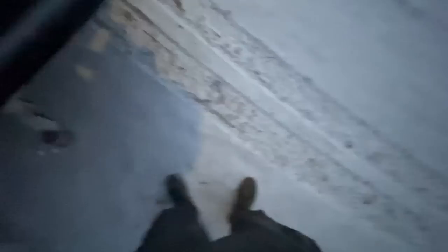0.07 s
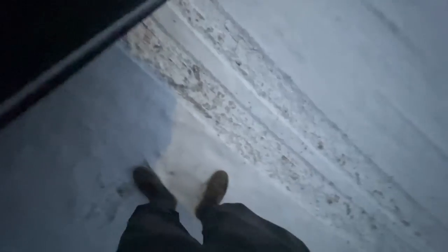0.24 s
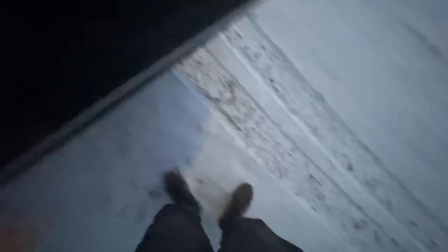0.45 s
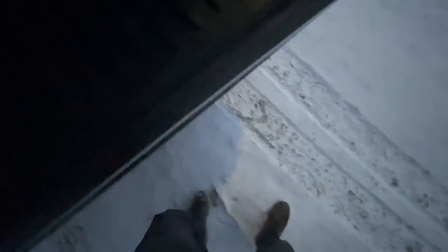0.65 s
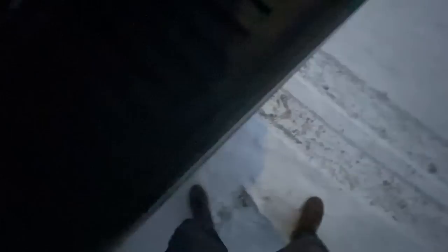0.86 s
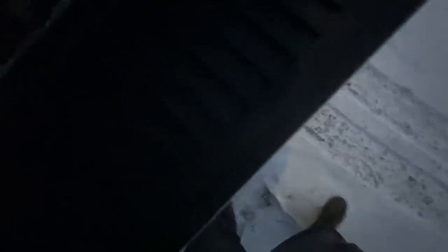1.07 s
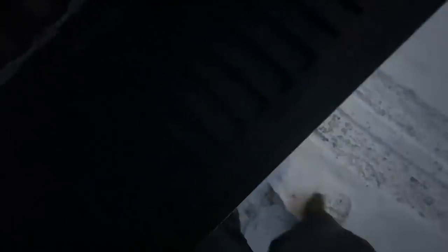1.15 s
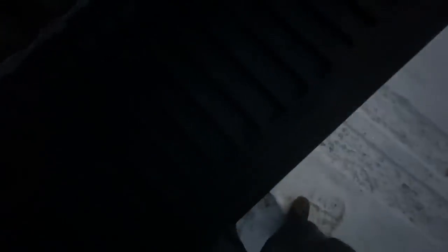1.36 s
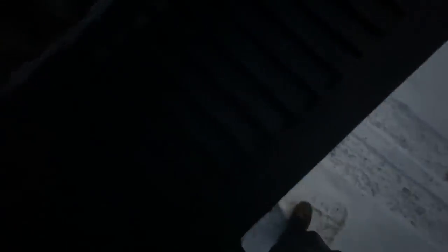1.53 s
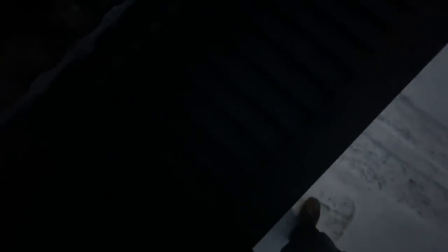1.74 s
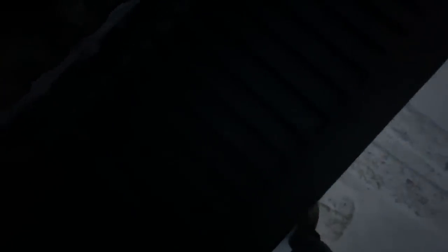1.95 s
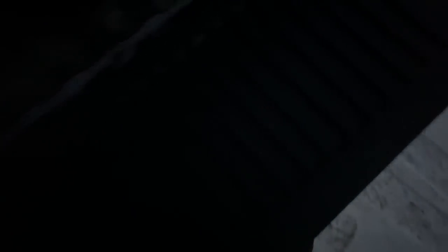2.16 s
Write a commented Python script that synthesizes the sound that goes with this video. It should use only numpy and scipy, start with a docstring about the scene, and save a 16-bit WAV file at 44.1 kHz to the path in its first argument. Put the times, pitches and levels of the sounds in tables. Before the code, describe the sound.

A truck tailgate unlatches with a heavy metallic thump, then rattles as boots creak on snow

```python
"""A tailgate is lowered by someone standing in snow. First a tug on the handle: light knocks and a faint bed rumble.
At 0.22 s the latch lets go in six blows and a sharp snap: noise bursts plus damped panel and steel modes that ring on.
The swinging gate knocks and squeaks (tones, noise bursts, trembling whistles) while a jacket swishes (bright noise).
From 0.8 s boots creak, scuff and snap the snow (short modes, grainy noise); from 1.8 s the gate knocks again.
Low outdoor noise lies under it all. Two spaced microphones hear the truck from the left, the boot from the right."""
import sys
import numpy as np
from scipy import signal
from scipy.fft import rfft, irfft, next_fast_len
from scipy.io import wavfile
from scipy.ndimage import uniform_filter1d

SR = 44100
rng = np.random.default_rng(int(sys.argv[2]) if len(sys.argv) > 2 else 0)


def materialize(psi):
    """Save the field psi as 16-bit PCM at rate SR to the path in sys.argv[1].

    A 1-D psi becomes a single channel; in a 2-D psi each row is a channel.
    """
    bounded = np.clip(np.atleast_2d(psi).T, -1, 1)
    quanta = np.round(bounded * 32767).astype(np.int16)
    wavfile.write(sys.argv[1], SR, quanta)


N = 97020
T = np.arange(N) / SR

# Spectra are relative: texture() scales each shaped noise to rms 1.
# latch blows: start_s, boom_db, clatter_db, crack_db
LATCH_BLOWS = [(0.222, -23.5, -17, -31.5), (.232, -9.5, -13.5, -26), (.243, -15, -13, -22),
               (0.247, -19.5, -14.5, -20), (0.262, -21.5, -16, -33), (0.28, -18.5, -20.5, -30.5)]
BLOW_RISE_S, BOOM_T60_S, CLATTER_T60_S, CRACK_T60_S = 0.0016, 0.18, 0.16, 0.13
# low boom of a blow: freq_hz, level_db
BOOM_SPECTRUM = [(30, -22.5), (50, -3.5), (100, -4.5), (160, -1), (230, -7.5), (400, -12.5), (900, -68.5)]
# mid clatter of a blow: freq_hz, level_db
CLATTER_SPECTRUM = [(80, -47), (250, -13), (350, -2), (680, -2.5), (950, -7), (1300, -8.5), (2000, -27),
                    (4000, -60.5)]
# bright crack of a blow: freq_hz, level_db
CRACK_SPECTRUM = [(500, -29.5), (1300, -9.5), (1850, 7), (2600, 1.5), (3200, -2.5), (3800, -8.5),
                  (5000, -12), (6500, -12), (8000, -16.5), (15000, -39)]
# modes of the steel panel: pitch_hz, level_db, t60_s
PANEL_MODES = [(59.7, -20, 1.18), (86, -24, 0.63), (105.5, -33.5, 4.5), (123.7, -11, 0.22),
               (168.8, -17.5, 0.33), (191.3, -29, 1), (228.8, -33, 1.3), (344, -29, 1), (385, -30.5, 0.63),
               (446.5, -31, 0.8), (504.6, -29.5, 0.6), (561, -24, .25), (910, -31.5, 0.17)]
PANEL_START_S, PANEL_RISE_S = 0.231, 0.006
# truck-bed rumble after the handle tug and the thump: start_s, level_db
BED_JOLTS = [(0, -33.5), (0.234, -17)]
BED_T60_S = 0.84
# truck-bed rumble: freq_hz, level_db
BED_SPECTRUM = [(30, -12.5), (55, -7.5), (150, 0.5), (250, -9.5), (500, -19), (1000, -23.5), (2500, -35.5),
                (15000, -60)]

# latch and hinge modes, level relative to the contact: pitch_hz, level_db, t60_s
STEEL_MODES = [(1065, 9, .2), (1790, -2, 0.083), (2040, -10.5, 0.35), (2540, -5, 0.093), (3686, 0.5, 0.07),
               (4540, -20.5, 0.018)]
# contact level relative to the blow's crack / the knock's crunch
STEEL_BLOW_DB, STEEL_KNOCK_DB, STEEL_RISE_S = -10, -14, 0.0024

# gate knocks: start_s, pitch_hz, tone_db, tone_t60_s, body_db, crunch_db, noise_t60_s
GATE_KNOCKS = [(.001, 317, -24, 0.25, -39, -47.5, 0.091), (.031, 298, -18, 0.068, -28.5, -28.5, 0.12),
               (0.038, 185.3, -27, 0.27, -35, -57, 0.3), (0.109, 123, -34, 0.064, -68, -42.5, 0.15),
               (.281, 161.5, -16, 0.1, -28.5, -43, 0.055), (.416, 358, -42, 0.034, -26, -29, 0.16),
               (.45, 141, -22, 0.059, -31.5, -60, .12), (.479, 233, -25, 0.16, -37, -50, 0.1),
               (.553, 1120, -23.5, 0.022, -32, -67, .06), (.599, 230, -25, 0.16, -37, -56, 0.091),
               (.727, 242, -21, 0.037, -38, -79.5, 0.098), (.851, 183, -28, 0.065, -36, -68, .05),
               (1.805, 136, -18.5, 0.1, -38, -32, 0.034), (1.813, 555, -26.5, 0.091, -34, -39.5, 0.18),
               (1.909, 750, -20, 0.045, -39, -37, 0.083), (1.957, 678, -13.5, 0.026, -27.5, -37, 0.1),
               (2.045, 158, -35, 0.29, -36.5, -48.5, 0.37), (2.076, 361.5, -20, 0.097, -26, -26, 0.062),
               (2.082, 165.4, -22.5, 0.19, -22.5, -43, 0.063), (2.109, 590, -29.5, 0.14, -31, -36.5, 0.11),
               (2.167, 591, -24, 0.076, -28.5, -43.5, 0.18)]
KNOCK_RISE_S = 0.0012
# hollow body of a knock: freq_hz, level_db
BODY_SPECTRUM = [(90, -26), (150, 5), (350, 7.5), (550, 2), (740, 6.5), (900, -14.5), (1250, -9.5),
                 (2200, -39.5)]
# gritty edge of a knock: freq_hz, level_db
CRUNCH_SPECTRUM = [(400, -17.5), (1200, 16.5), (1800, 6), (2600, 8.5), (3150, 4.5), (4300, -2.5),
                   (5600, -6), (12000, -44)]
# dry squeaks as the load shifts: start_s, pitch_hz, level_db, t60_s
SQUEAK_EVENTS = [(.031, 2099, -31.5, 0.043), (0.423, 2380, -20.5, 0.031), (1.806, 2663, -40.5, 0.19),
                 (1.912, 2570, -38, .06), (2.075, 4256, -34, 0.032)]
SQUEAK_RISE_S, SQUEAK_TREMBLE = 0.003, 0.025  # tremble: rms share of the pitch

# slips of snow packing under the boot: start_s, level_db
SNOW_CREAKS = [(.789, -36.5), (.806, -31), (.816, -37.5), (0.825, -35), (.836, -30)]
CREAK_RISE_S, GRIT_T60_S, GRIT_DB = 0.0007, 0.035, 3  # GRIT_DB relative to the creak
# sole modes, level relative to the creak: pitch_hz, level_db, t60_s
SOLE_MODES = [(511, 0, 0.052), (820, 1, 0.028)]
# grit of a creak: freq_hz, level_db
GRIT_SPECTRUM = [(200, -6), (500, 12), (900, 1), (1150, 1.5), (1600, -14.5), (3000, -21), (15000, -36.5)]
# sole scuffing loose snow: start_s, level_db, rise_s, t60_s
SNOW_SCUFFS = [(.83, -51, 0.013, 0.46), (1.055, -42, 0.016, 0.52), (1.15, -39, 0.018, 0.35)]
# snaps of the crust: start_s, level_db
CRUST_SNAPS = [(1.174, -36.5), (1.1958, -29), (1.209, -34), (1.2193, -35.5)]
SNAP_RISE_S, SNAP_T60_S = 0.0003, 0.016
# scuffs and snaps: freq_hz, level_db
SNOW_SPECTRUM = [(200, -16), (450, 5), (850, 3), (1300, -1.5), (2500, -7), (4500, -11.5), (7000, -27),
                 (15000, -25)]
# hiss of kicked-up powder: start_s, level_db, rise_s, t60_s
POWDER_HISSES = [(1.04, -44, 0.043, .4), (1.285, -44, 0.014, 0.12)]
# powder hiss: freq_hz, level_db
POWDER_SPECTRUM = [(4000, -38), (6500, -3), (9000, -12), (10500, -12), (13000, 0), (15500, -10.5)]

# bright noise bursts, the latch's sharp snap at .227, otherwise jacket swishes: start_s, level_db, rise_s, t60_s
BRIGHT_BURSTS = [(.108, -50, 0.00087, 0.042), (.227, -25, 0.00079, 0.082), (.415, -42.5, 0.0033, 0.098),
                 (.554, -43, 0.0012, 0.12), (.607, -43.5, .0003, 0.086), (.722, -44, 0.0058, 0.073),
                 (.78, -42.5, 0.026, 0.19)]
# faint rustle of clothes between the bursts: time_s, level_db
RUSTLE_LEVEL = [(0, -61.5), (.2, -58.5), (.3, -49.5), (.5, -55), (.68, -65.5), (.95, -67), (1.2, -58),
                (1.32, -62.5), (1.38, -96), (1.78, -73.5), (1.81, -59.5), (2.2, -63.5)]
# bright noise: freq_hz, level_db
BRIGHT_SPECTRUM = [(800, -25), (3000, 3), (5000, -0.5), (6400, 3.5), (7500, -6), (8800, 5), (10500, -8),
                   (13500, -1), (16000, -31.5)]
# outdoor rumble: freq_hz, level_db
AIR_SPECTRUM = [(30, -24), (52, -2.5), (90, -5), (140, -13), (300, -18.5), (700, -24), (1380, -23.5),
                (1650, -27), (3600, -52), (15000, -56)]
# outdoor rumble over time: time_s, level_db
AIR_LEVEL_CURVE = [(0, -38.5), (.7, -46.5), (.95, -43), (1.45, -49.5), (1.75, -49.5), (2.2, -41)]

# arrival from the truck: freq_hz, left_lead_ms
TRUCK_LEAD = [(550, 0.62), (1200, 0.4676)]
# arrival from the boot: freq_hz, left_lead_ms
BOOT_LEAD = [(1000, -0.069)]
# left lead of the bright noise, narrowing to the centre in the top treble: freq_hz, left_lead_ms
BRIGHT_LEAD = [(6000, 0.41), (10500, 0.011)]
# share common to both channels in most textures: freq_hz, power_share
COMMON_SHARE = [(100, 0.98), (1200, 0.6), (2500, 0.35), (8000, 1)]
# share common to both channels in the bright noises, complete above 12 kHz: freq_hz, power_share
BRIGHT_COMMON_SHARE = [(3000, 0.74), (9000, 0.13), (12000, 1)]
# shading of truck and bright noise: freq_hz, left_minus_right_db
LEFT_SHADING = [(60, 2), (130, 5.5), (280, 1.5), (550, 6), (1100, 3), (2200, 0.5), (4000, 4), (7000, 6),
                (12000, -1.5)]
# echoes off nearby steel and ground: delay_ms, high_frequency_gain
NEAR_ECHOES = [(1.9, 0.036), (4.3, 0.1), (7.1, 0.027)]
MIC_SPACING_S = 0.00047  # sound travel time between microphones
HALF_SPLIT = np.array([[0.5], [-0.5]])  # left, right

LOW_CUT_HZ, TOP_HZ = 36, 15800
HEADROOM = 0.75  # ceiling of the soft limiter


def amp(db):
    """Decibels to amplitude."""
    return 10 ** (np.asarray(db) / 20)


def unit(x):
    """Scale to rms 1."""
    return x / np.sqrt(np.mean(x ** 2) + 1e-20)


def along(points, hz):
    """Interpolate (hz, value) points on a log frequency axis."""
    f, v = np.transpose(points)
    return np.interp(np.log(hz + 1), np.log(f + 1), v)


def level_curve(points):
    """Amplitude over time from (time_s, level_db) points."""
    return amp(np.interp(T, *np.transpose(points)))


def filtered(x, response):
    """Multiply the spectrum by a complex response of frequency."""
    m = next_fast_len(N + 8192)
    return irfft(rfft(x, m) * response(np.fft.rfftfreq(m, 1 / SR)), m)[..., :N]


def struck(start_s, rise_s, t60_s):
    """Strike envelope: exponential rise, then decay by 60 dB per t60."""
    t = np.maximum(T - start_s, 0)
    return (1 - np.exp(-t / rise_s)) * 10 ** (-3 * t / t60_s)


def ring(start_s, hz, db, rise_s, t60_s):
    """One damped vibration."""
    return amp(db) * struck(start_s, rise_s, t60_s) * np.sin(2 * np.pi * hz * (T - start_s))


def bursts(rows):
    """Joint envelope of (start_s, level_db, rise_s, t60_s) bursts, added in power."""
    return np.sqrt(sum((amp(db) * struck(s, rise, t60)) ** 2 for s, db, rise, t60 in rows))


def panned(x, left_db):
    """Left minus right level is left_db."""
    return x * amp(HALF_SPLIT * left_db)


def arriving(x, lead):
    """Mono to stereo: opposite half delays in the two channels."""
    return filtered(x, lambda hz: np.exp(2j * np.pi * HALF_SPLIT * hz * along(lead, hz) / 1000))


def texture(spectrum, lead, spiky_db, rate_hz=2500, common=COMMON_SHARE):
    """Stereo noise of rms 1 with stepped random grain size: a part common to both channels and a scattered one."""
    steps = amp(spiky_db * np.clip(rng.standard_normal(N), -2, 2))
    size = steps[(T * min(rate_hz, SR)).astype(int)]
    common_noise, mid_noise, side_noise = unit(rng.standard_normal((3, N)) * size)

    def share(hz):
        return np.clip(along(common, hz), 0, 1)

    def scatter(hz):
        # diffuse-field coherence between the microphones
        alike = np.sinc(2 * hz * MIC_SPACING_S)
        return np.sqrt((1 - share(hz)) * np.array([1 + alike, 1 - alike]) / 2)

    mid, side = filtered(np.array([mid_noise, side_noise]), scatter)
    common_pair = filtered(arriving(common_noise, lead), lambda hz: np.sqrt(share(hz)))
    pair = common_pair + np.array([mid + side, mid - side])
    return unit(filtered(pair, lambda hz: amp(along(spectrum, hz))))


def patchy(x, depth_db):
    """Patches of time and frequency swell and sink at random; rms 1."""
    z = signal.stft(x, nperseg=1024)[2]
    field = uniform_filter1d(rng.standard_normal(z.shape[1:]), size=5, axis=0)
    field = unit(uniform_filter1d(field, size=5, axis=1))
    return unit(signal.istft(z * amp(depth_db * field), nperseg=1024)[1][:, :N])


def thump():
    """The latch lets go in a quick run of blows; panel modes and truck-bed noise ring on."""
    boom_env = bursts([(s, db, BLOW_RISE_S, BOOM_T60_S) for s, db, _, _ in LATCH_BLOWS])
    boom = boom_env * texture(BOOM_SPECTRUM, TRUCK_LEAD, spiky_db=0.5)
    clatter_env = bursts([(s, db, BLOW_RISE_S, CLATTER_T60_S) for s, _, db, _ in LATCH_BLOWS])
    clatter = clatter_env * texture(CLATTER_SPECTRUM, TRUCK_LEAD, spiky_db=3)
    crack_env = bursts([(s, db, BLOW_RISE_S, CRACK_T60_S) for s, _, _, db in LATCH_BLOWS])
    crack = crack_env * texture(CRACK_SPECTRUM, TRUCK_LEAD, spiky_db=4, rate_hz=1000)
    modes = sum(ring(PANEL_START_S, hz, db, PANEL_RISE_S, t60) for hz, db, t60 in PANEL_MODES)
    panel = arriving(modes, TRUCK_LEAD)
    bed_env = bursts([(s, db, PANEL_RISE_S, BED_T60_S) for s, db in BED_JOLTS])
    bed = bed_env * texture(BED_SPECTRUM, TRUCK_LEAD, spiky_db=3, rate_hz=200)
    return boom + clatter + crack + panel + bed


def fittings():
    """Every blow and knock rings the latch and hinge modes with random balance and phase."""
    contacts = [(s, crack_db + STEEL_BLOW_DB) for s, _, _, crack_db in LATCH_BLOWS]
    contacts += [(s, crunch_db + STEEL_KNOCK_DB) for s, *_, crunch_db, _ in GATE_KNOCKS]
    hz, level_db, t60_s = np.transpose(STEEL_MODES)[:, :, None]
    out = np.zeros(N + SR)
    t = T[:SR // 4]
    rise = 1 - np.exp(-t / STEEL_RISE_S)
    for start_s, db in contacts:
        balance, cycles = rng.standard_normal((2, len(STEEL_MODES), 1))
        decay = amp(db + level_db + 2 * balance) * 10 ** (-3 * t / t60_s)
        modes = decay * np.sin(2 * np.pi * (hz * t + cycles))
        first = max(round(start_s * SR), 0)
        out[first:][:len(t)] += modes.sum(0) * rise
    return arriving(out[:N], TRUCK_LEAD)


def knocks():
    """Each gate knock is a damped tone, a hollow noise body and a gritty edge."""
    tones = sum(ring(s, hz, db, KNOCK_RISE_S, t60) for s, hz, db, t60, *_ in GATE_KNOCKS)
    body_env = bursts([(s, db, KNOCK_RISE_S, t60) for s, *_, db, _, t60 in GATE_KNOCKS])
    body = body_env * texture(BODY_SPECTRUM, TRUCK_LEAD, spiky_db=-1.0)
    crunch_env = bursts([(s, db, KNOCK_RISE_S, t60) for s, *_, db, t60 in GATE_KNOCKS])
    crunch = crunch_env * texture(CRUNCH_SPECTRUM, TRUCK_LEAD, spiky_db=4, rate_hz=1500)
    return arriving(tones, TRUCK_LEAD) + body + crunch


def squeaks():
    """Dry stick-slip: a brief whistle whose pitch trembles."""
    out = np.zeros(N)
    for start_s, hz, db, t60_s in SQUEAK_EVENTS:
        tremble = unit(uniform_filter1d(rng.standard_normal(N), size=60))
        phase = 2 * np.pi * np.cumsum(hz * (1 + SQUEAK_TREMBLE * tremble)) / SR
        out += amp(db) * struck(start_s, SQUEAK_RISE_S, t60_s) * np.sin(phase)
    return arriving(out, TRUCK_LEAD)


def boots():
    """Packing snow slips and rings the sole; the sole then scuffs crystals, snaps crust and throws up powder."""
    slips = sum(ring(s, hz, db + mode_db, CREAK_RISE_S, t60)
                for s, db in SNOW_CREAKS for hz, mode_db, t60 in SOLE_MODES)
    grit_env = bursts([(s, db + GRIT_DB, CREAK_RISE_S, GRIT_T60_S) for s, db in SNOW_CREAKS])
    grit = grit_env * texture(GRIT_SPECTRUM, BOOT_LEAD, spiky_db=3)
    creaks = arriving(slips, BOOT_LEAD) + grit
    scuffs = bursts(SNOW_SCUFFS) * texture(SNOW_SPECTRUM, BOOT_LEAD, spiky_db=4.5, rate_hz=1200)
    snap_env = bursts([(s, db, SNAP_RISE_S, SNAP_T60_S) for s, db in CRUST_SNAPS])
    snaps = snap_env * texture(SNOW_SPECTRUM, BOOT_LEAD, spiky_db=1)
    hiss = texture(POWDER_SPECTRUM, BOOT_LEAD, spiky_db=5.0, common=BRIGHT_COMMON_SHARE)
    powder = bursts(POWDER_HISSES) * hiss
    return panned(creaks, left_db=-3.5) + panned(scuffs + snaps, left_db=-5.5) + powder


def snap_and_jacket():
    """One bright noise: the latch's sharp snap, and stiff cloth rubbing on itself in swishes and faint rustle."""
    level = np.hypot(bursts(BRIGHT_BURSTS), level_curve(RUSTLE_LEVEL))
    noise = texture(BRIGHT_SPECTRUM, BRIGHT_LEAD, spiky_db=2.7, rate_hz=700, common=BRIGHT_COMMON_SHARE)
    return level * noise


def air():
    """Low outdoor rumble that wanders in level and colour."""
    lead = [(100, 0.94), (1000, 0.27)]  # freq_hz, left_lead_ms
    rumble = patchy(texture(AIR_SPECTRUM, lead, spiky_db=2), depth_db=2.2)
    return level_curve(AIR_LEVEL_CURVE) * rumble


def from_left(x):
    """The camera body shades the right microphone, by frequency."""
    return filtered(x, lambda hz: amp(HALF_SPLIT * along(LEFT_SHADING, hz)))


def echoed(x):
    """Close surfaces return mids and highs a moment later: a comb with weak lows."""
    def comb(hz):
        size = hz / np.hypot(hz, 900)
        echoes = sum(gain * np.exp(-2j * np.pi * hz * ms / 1000) for ms, gain in NEAR_ECHOES)
        power = 1 + size ** 2 * sum(gain * gain for _, gain in NEAR_ECHOES)
        return (1 + size * echoes) / np.sqrt(power)
    return filtered(x, comb)


def scene():
    """Truck and bright noise shaded to the left, boots added, all echoed; air stays dry."""
    left = from_left(thump() + fittings() + knocks() + squeaks() + snap_and_jacket())
    return echoed(left + boots()) + air()


def record(dry):
    """High-pass, soft peak limiter, then a sharp band limit."""
    low_cut = signal.butter(2, LOW_CUT_HZ, 'high', fs=SR, output='sos')
    x = signal.sosfilt(low_cut, dry)
    x = x / (1 + np.abs(x / HEADROOM) ** 8) ** (1 / 8)
    return filtered(x, lambda hz: hz < TOP_HZ)


dry = scene()
out = record(dry)
materialize(out)
```